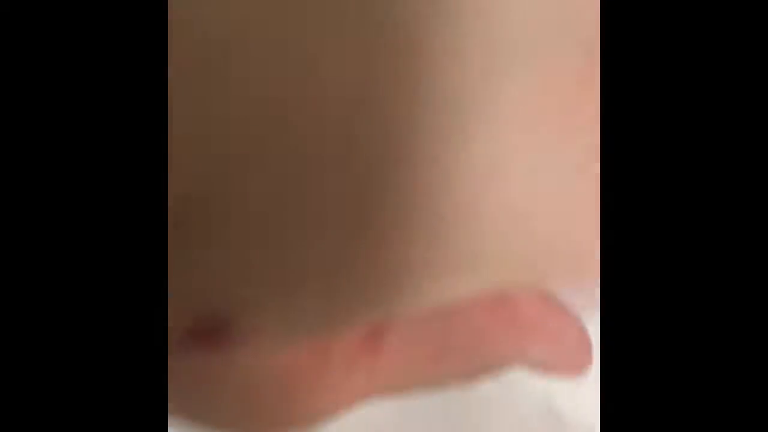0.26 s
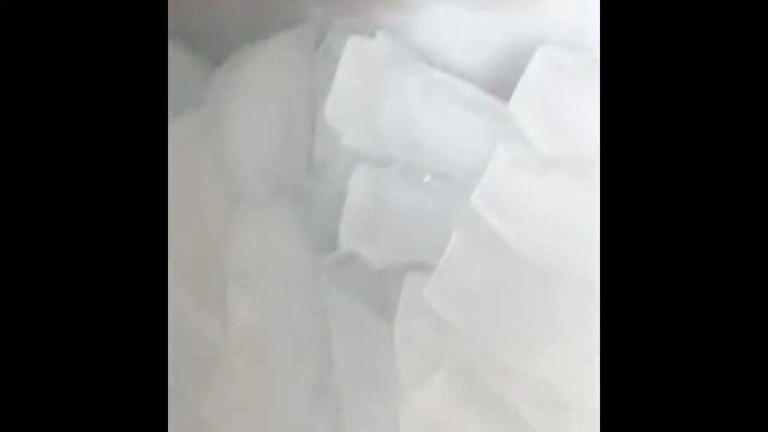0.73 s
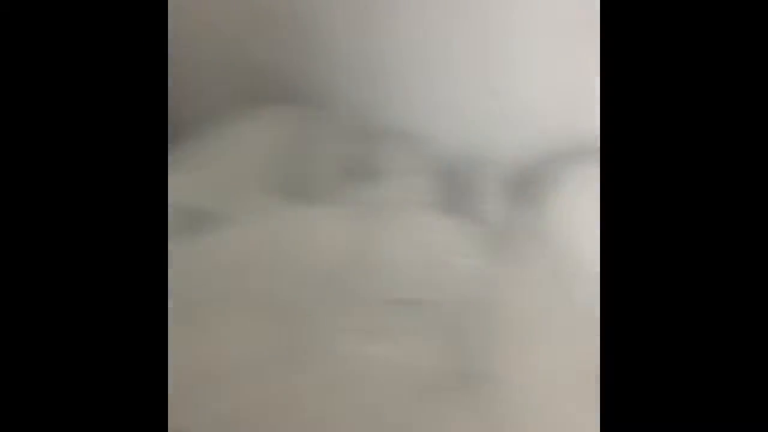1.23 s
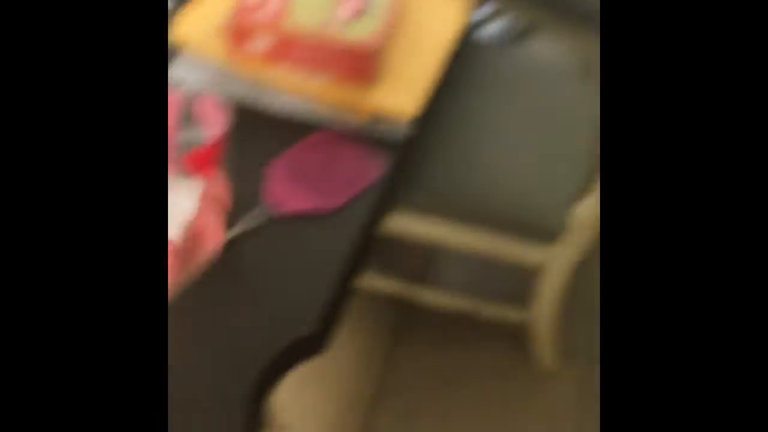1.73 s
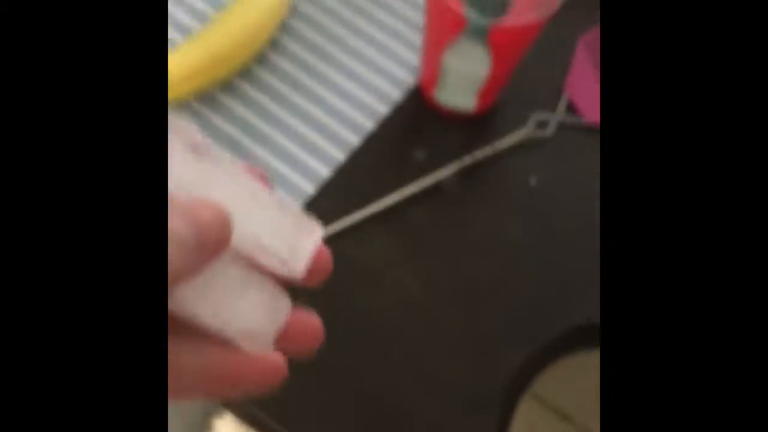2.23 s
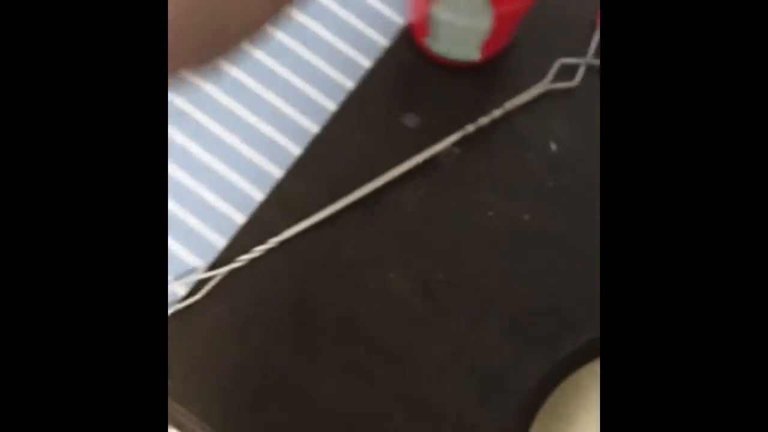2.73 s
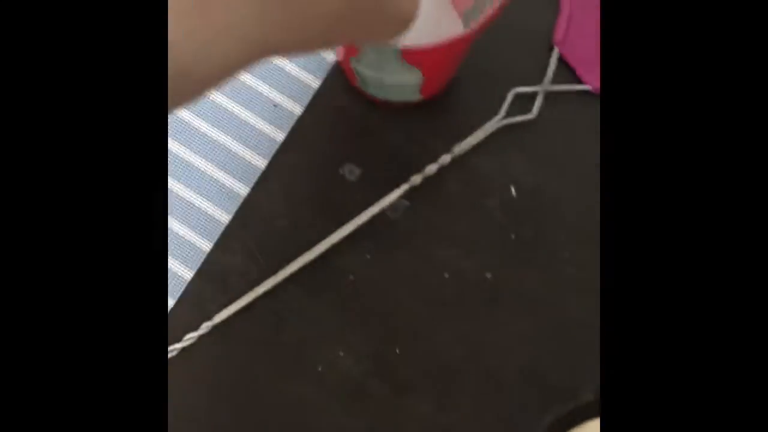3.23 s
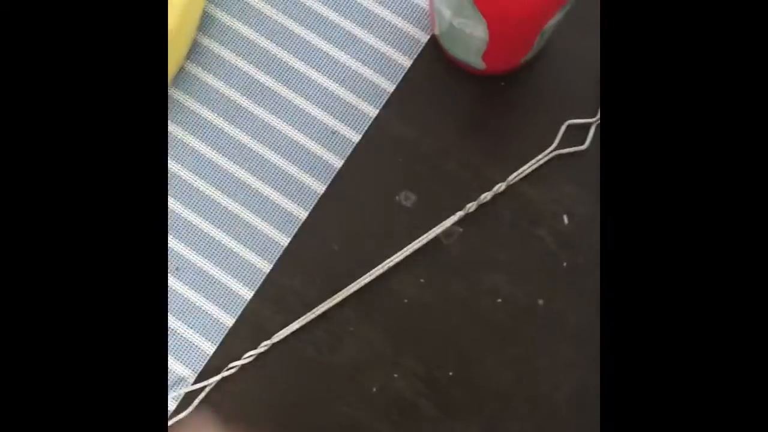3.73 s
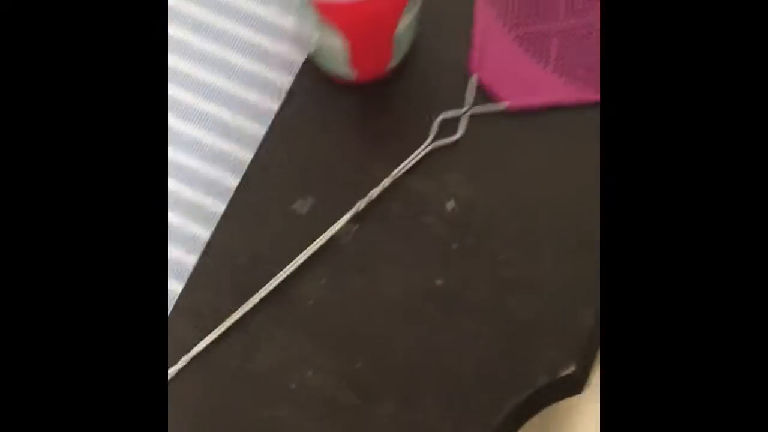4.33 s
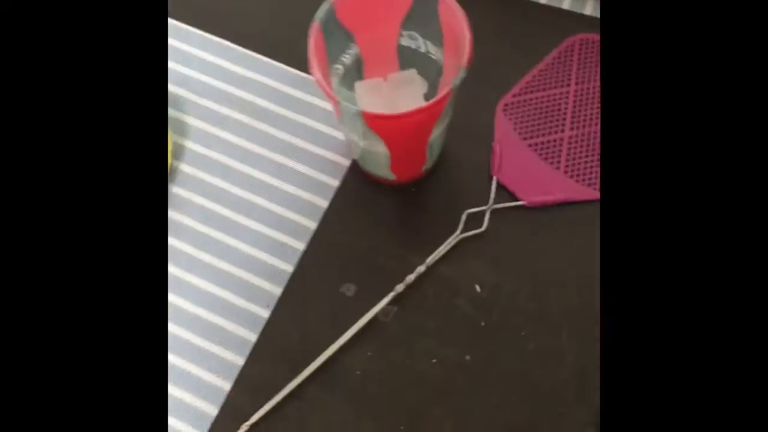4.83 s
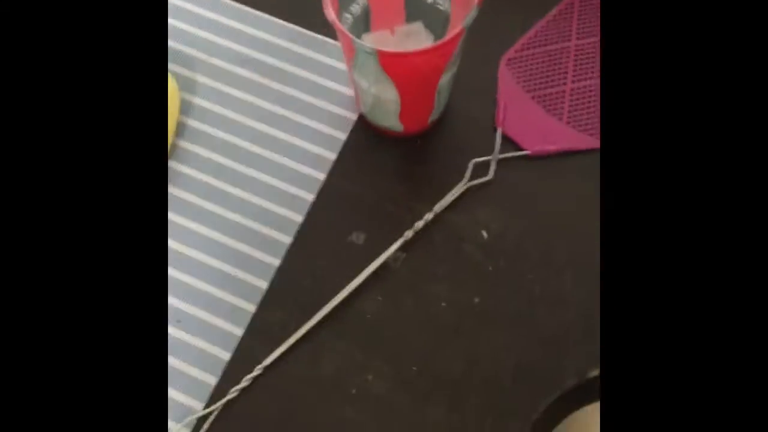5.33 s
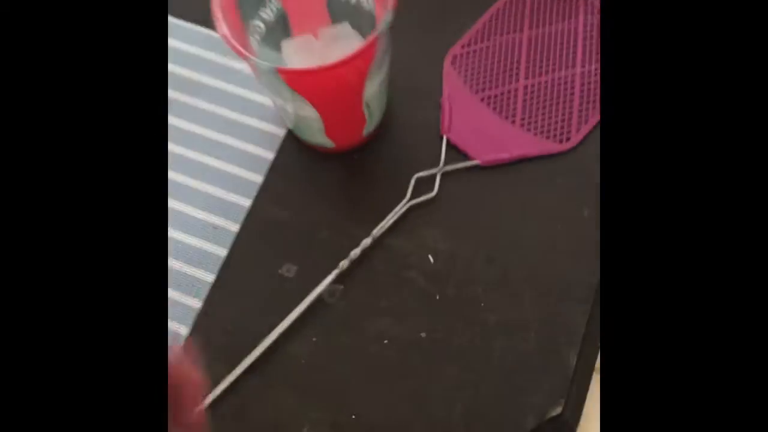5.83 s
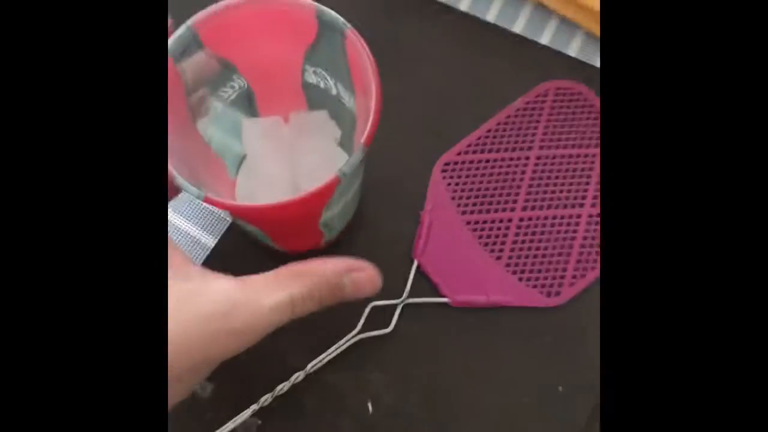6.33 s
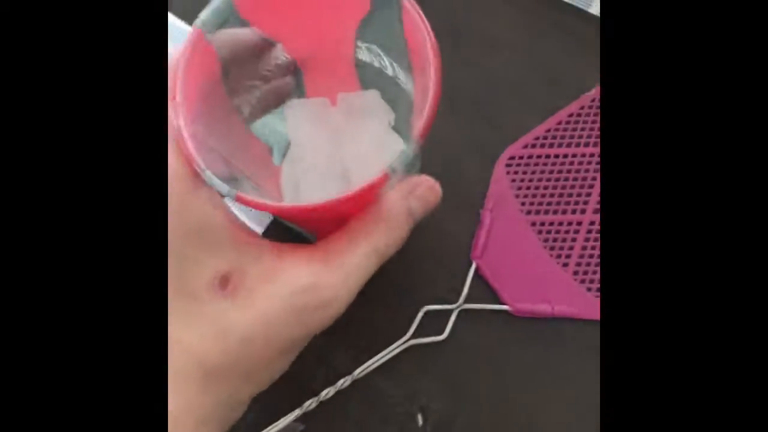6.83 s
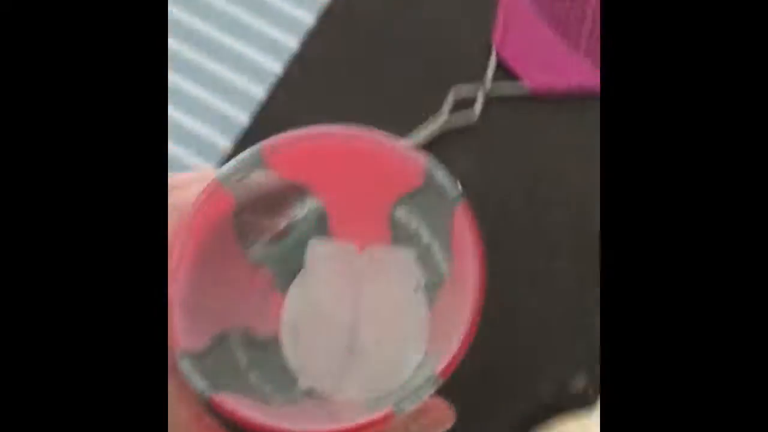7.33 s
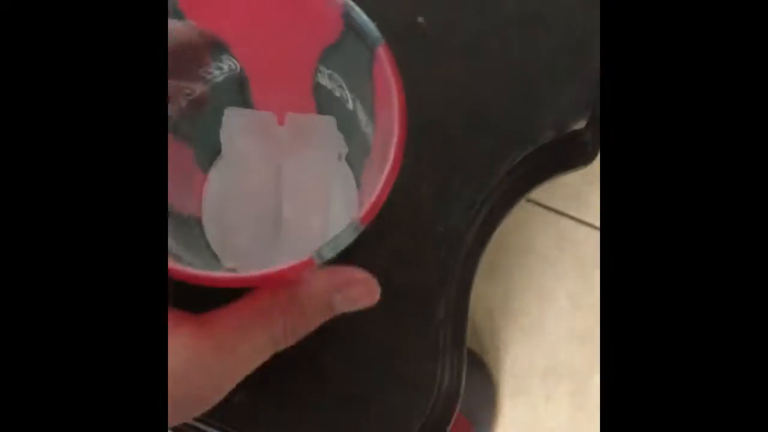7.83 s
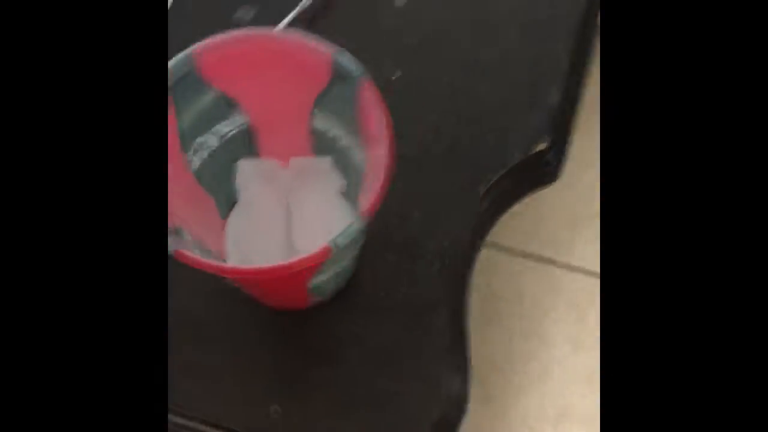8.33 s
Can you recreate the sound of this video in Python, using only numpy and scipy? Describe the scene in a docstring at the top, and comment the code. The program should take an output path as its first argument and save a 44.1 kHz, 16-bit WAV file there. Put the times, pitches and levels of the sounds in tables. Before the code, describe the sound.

Over a low freezer hum, a hand rummages through ice, cubes bounce in a plastic cup, a door thumps shut, and the cup lands hard and scrapes.

```python
"""Ice into a plastic cup

A hand digs ice cubes out of a freezer bin and drops them into a plastic cup on a kitchen table.
The freezer hums and rumbles, duller once its door slams; the cup is handled, set down hard and rocks to rest.
Slippers scuff on the tiles and faint high pings repeat at first, in a small hard room.
Blows are damped modes and filtered noise bursts; rubbing and air are shaped noise; the motor is a few sines."""
import sys
import numpy as np
from scipy import signal
from scipy.fft import rfft, irfft, next_fast_len
from scipy.io import wavfile
from scipy.ndimage import uniform_filter1d, minimum_filter1d, map_coordinates

SR = 44100
rng = np.random.default_rng(int(sys.argv[2]) if len(sys.argv) > 2 else 0)


def log_audio(samples):
    """Write samples as a 16-bit WAV file to the path given in sys.argv[1]."""
    # one column per channel
    frames = np.atleast_2d(samples).T
    # limit to full scale, then quantise
    limited = np.clip(frames, -1, 1)
    pcm = np.round(limited * 32767).astype(np.int16)
    wavfile.write(sys.argv[1], SR, pcm)


N = 377937
TIME = np.arange(N) / SR
AGE = TIME[:SR // 2]  # time since a blow (s)
DRAG_PEAK_S = 7.96  # the cup's base drags loudest here

# resonances of the air in the cup: [pitch_hz, level_db, t60_s]
CUP_HOLLOW = [(675, 0.5, 0.095), (632, -7, 0.059), (712, -10.5, 0.085)]


def amp(db):
    """Decibels to a linear factor."""
    return 10 ** (np.asarray(db) / 20)


def unit(x):
    """x scaled to an rms of 1."""
    return x / np.sqrt(np.mean(x ** 2) + 1e-20)


def peaked(x):
    """x scaled to a peak of 1."""
    return x / (np.abs(x).max() + 1e-20)


def along(points, hz):
    """Interpolate (Hz, value) points on a log frequency axis."""
    f, v = np.transpose(points)
    return np.interp(np.log(hz + 1), np.log(f + 1), v)


def curves(rows):
    """One value per sample for each column after the time."""
    s, *cols = np.transpose(rows)
    return [np.interp(TIME, s, c) for c in cols]


def wobble(rate):
    """A smooth random curve with rate knots a second."""
    knots = rng.standard_normal(int(N * rate / SR) + 4)
    return map_coordinates(knots, [TIME * rate])


def add(track, s, sound):
    """Mix a sound into a track at time s."""
    start = max(round(s * SR), 0)
    track[start:start + len(sound)] += sound[:N - start]


def coloured(x, spectrum):
    """Filter x to a (Hz, dB) spectrum with minimum phase, so nothing sounds before its cause."""
    m = 2 * next_fast_len(len(x) // 2 + 2048)
    gain = amp(along(spectrum, np.fft.rfftfreq(m, 1 / SR)))
    cepstrum = irfft(np.log(np.maximum(gain, 1e-5)))
    # folding the cepstrum onto positive time gives the minimum phase
    cepstrum[1:m // 2] *= 2
    cepstrum[m // 2 + 1:] = 0
    return irfft(rfft(x, m) * np.exp(rfft(cepstrum)), m)[:len(x)]


def band(x, lo_hz, hi_hz):
    """Causal band-pass."""
    edges = [lo_hz, min(hi_hz, SR / 2 - 1)]
    return signal.sosfilt(signal.butter(2, edges, "band", fs=SR, output="sos"), x)


def noise(spectrum):
    """Steady coloured noise of rms 1."""
    return unit(coloured(rng.standard_normal(N), spectrum))


def burst(t60):
    """White noise dying by 60 dB in t60 seconds."""
    return rng.standard_normal(len(AGE)) * amp(-60 * AGE / t60)


def ring(modes, scatter_db, lead=0):
    """Damped modes, at new strengths for each blow; lead (s) advances their phase."""
    total = 0
    for hz, db, t60 in modes:
        level_db = db + scatter_db * rng.standard_normal()
        total = total + amp(level_db - 60 * AGE / t60) * np.sin(2 * np.pi * hz * (AGE + lead))
    return total


def in_kitchen(x, wet_db):
    """A sound and the room's answer: a noise tail whose frequencies each die at their own speed."""
    # the kitchen's decay: [pitch_hz, t60_s]
    room_decay = [(100, 0.72), (700, 0.39), (3000, 0.42), (8000, 0.3), (15000, 0.087)]
    hz, t, z = signal.stft(rng.standard_normal(len(AGE)), SR, nperseg=256)
    fade = amp(-60 * t / along(room_decay, hz)[:, None])
    tail = signal.istft(z * fade, SR, nperseg=256)[1]
    tail = tail * (1 - np.exp(-TIME[:len(tail)] / 0.002))
    answer = signal.fftconvolve(x, tail / np.linalg.norm(tail))[:len(x)]
    return x + amp(wet_db) * answer


def contact(body, clack_db, splinter_db, clack_t60, splinter_t60, crush):
    """A hard contact: a clack in the body's colour and a brighter splinter, building up while the tips crush."""
    rise = 1 - np.exp(-AGE / crush)
    clack = band(coloured(rise * burst(clack_t60), body), 1000, 6500)
    splinter = band(coloured(rise * burst(splinter_t60), body), 5800, 17000)
    return amp(clack_db) * peaked(clack) + amp(splinter_db) * peaked(splinter)


def ice_bin():
    """Cubes grind and clack against each other; each rings at its own size and shakes the pile and the bin."""
    # the loudest cubes knocking, levels before the trims below: [start_s, clack_db, splinter_db]
    bin_hits = [(0.015, -11.5, -34.5), (0.0523, -25, -38.5), (0.0932, -19.5, -33), (0.19, -30.5, -30),
                (0.2174, -18.5, -34.5), (0.2247, -15, -25.5), (0.2428, -14.5, -26), (0.2652, -16, -25.5),
                (0.3128, -12, -34), (0.337, -13.5, -32.5), (0.3444, -12.5, -36), (0.3595, -19, -37.5),
                (0.3835, -20.5, -37), (0.4763, -32.5, -30.5), (0.504, -13.5, -28), (0.5312, -16.5, -32.5),
                (0.5427, -15.5, -30.5), (0.5617, -13, -30), (0.6276, -14, -32.5), (0.7069, -13.5, -34.5)]
    # colour of ice in its bin: [pitch_hz, level_db]
    bin_colour = [(88, -38), (150, -9.5), (205, 3), (455, -10.5), (727, -8), (883, -15), (1230, -9),
                  (1550, -14.5), (3260, -22.5), (7250, -30), (10500, -32), (11600, -30.5), (12800, -31),
                  (14300, -22), (15800, -22.5)]
    # ice cubes ringing: [pitch_hz, level_db, t60_s]
    cube_modes = [(6560, -4.5, 0.032), (7830, -4, 0.053), (9910, -4, 0.083), (11240, -0.5, 0.027),
                  (11830, 2, 0.029), (14050, 0, 0.05), (14700, -4, .07)]
    dig_end_s, clinks_per_s, clink_scatter_db = 0.55, 45, 2
    out = np.zeros(N)

    # small clinks while the hand digs, unevenly spaced
    clinks = []
    chance = rng.standard_normal((int(np.ceil(dig_end_s * clinks_per_s)), 3))
    for k, (when, a, b) in enumerate(chance):
        s = (k + 0.5 + when / 2) / clinks_per_s
        clinks.append((s, -24.5 + clink_scatter_db * a, -39.5 + clink_scatter_db * b))

    for s, clack_db, splinter_db in list(bin_hits) + clinks:
        size = np.exp(0.02 * rng.standard_normal())
        cube = ring([(hz / size, db, t60) for hz, db, t60 in cube_modes], scatter_db=5.5)
        # the pile never rests the same way twice
        pile_hz = 2200 * np.exp(0.42 * rng.standard_normal(5))
        pile = ring([(hz, 0, 0.04) for hz in pile_hz], scatter_db=0.5)
        knock = band(coloured(burst(0.073) * (1 - np.exp(-AGE / 0.0036)), bin_colour), 175, 1260)
        knock_db = -17.5 + 0.506 * clack_db  # the bin's knock grows more slowly than the clack
        add(out, s, contact(bin_colour, clack_db - 2.5, splinter_db + 5,
                            clack_t60=0.033, splinter_t60=0.016, crush=0.002))
        add(out, s, amp(splinter_db + 6.5) * peaked(cube))
        add(out, s, amp(clack_db - 3) * peaked(pile))
        add(out, s, amp(knock_db) * peaked(knock))

    # cubes grinding: sparse random grains in swelling clusters, settling after the dig
    grains = (rng.random(N) < 3500 / SR) * rng.standard_normal(N) * amp(1.4 * wobble(40))
    grind_db = -38.5 - 54 * np.maximum(TIME - dig_end_s, 0)  # fades 54 dB per s
    out += amp(grind_db) * unit(band(coloured(grains, bin_colour), 170, 8000))
    return in_kitchen(out, wet_db=-16.5)


def ice_in_cup():
    """Cubes bounce in the cup, ring its wall and its hollow and jog the table."""
    # cubes striking the cup, levels before the trims below: [start_s, clack_db, splinter_db, ring_db]
    drops = [(3.3447, -32, -57.5, -21), (3.5495, -3, -18.5, -12), (3.5565, -7.5, -20.5, -14.5),
             (3.5685, -9.5, -17, -23), (3.5795, -10.5, -21, -14.5), (3.5865, -10.5, -16.5, -21.5),
             (3.5935, -20, -17, -23), (3.6235, -16, -26.5, -22), (3.663, -18.5, -10, -30),
             (3.6884, -19, -28.5, -10), (3.7092, -3.5, -24, -6), (3.7135, -2, -25.5, -14),
             (3.722, -15, -29.5, -15), (3.7365, -19.5, -25.5, -13.5), (3.7795, -17, -37, -17.5)]
    # resonances of the plastic wall: [pitch_hz, level_db, t60_s]
    wall_modes = [(555, -11, 0.082), (785, -7, 0.056), (1012, -12, 0.035), (1931, -17, 0.035),
                  (2273, -20.5, .04), (2904, -20.5, .03), (3970, -19, 0.028)]
    # colour of a click on the wall: [pitch_hz, level_db]
    wall_colour = [(530, -36.5), (900, -7), (1040, 2), (1160, -9), (1420, -3), (2030, 0), (2580, -7.5),
                   (3890, -7), (5000, -15.5), (5440, -8.5), (7700, -13), (12100, -9), (15800, -12.5)]
    out = np.zeros(N)
    for s, clack_db, splinter_db, ring_db in drops + settling(drops[-1], count=6):
        click = contact(wall_colour, clack_db - 4, splinter_db + 11.5,
                        clack_t60=0.014, splinter_t60=0.0028, crush=0.0012)
        wall = amp(clack_db - 5) * ring(wall_modes, scatter_db=2)
        # phase follows the clock, so each blow tops up the air's swing
        hollow = amp(ring_db - 4) * ring(CUP_HOLLOW, scatter_db=1, lead=s)
        hollow *= 1 - np.exp(-AGE / 0.00067)
        thud = band(burst(0.11) * (1 - np.exp(-AGE / 0.0069)), 65, 380)
        table = amp(ring_db - 17) * peaked(thud)
        add(out, s, in_kitchen(click + wall + table, wet_db=-11))
        add(out, s, in_kitchen(hollow, wet_db=-12))
    return out


def settling(blow, count):
    """After its last blow a cube chatters to rest in weaker contacts, at shrinking gaps after a short first one."""
    first_gap_s, gap_s, shrink = 0.011, 0.034, 0.9
    loss_db, ring_loss_db = 4.5, 16  # lost at each contact; extra loss of the ring
    s, clack_db, splinter_db, ring_db = blow
    delays = np.cumsum([first_gap_s] + [gap_s * shrink ** k for k in range(count)])
    contacts = []
    for k, delay in enumerate(delays):
        lost_db = loss_db * k
        contacts.append((s + delay, clack_db - lost_db, splinter_db - lost_db,
                         ring_db - ring_loss_db - lost_db))
    return contacts


def cup_on_table():
    """The cup's rim cracks on the table and its base flexes for a few cycles; near the end it drags."""
    # gripped, set down and rocking, levels before the trims below: [start_s, clack_db, base_db]
    knocks = [(6.7617, -44, -35), (6.7781, -29, -29.5), (7.1655, -52, -52.5), (7.3185, -48.5, -53),
              (7.6798, -9, -3.5), (7.9036, -47, -33.5), (7.9295, -43.5, -31), (7.9851, -24, -15)]
    # colour of the cup's base: [pitch_hz, level_db]
    base_colour = [(530, -33), (900, -0.5), (1370, -2), (1560, -5), (2080, -6.5), (2810, -16), (3620, -11),
                   (5000, -20.5), (6660, -13.5), (8570, -23.5), (9900, -14), (11800, -22), (15800, -19)]
    # the rim under the cup: [pitch_hz, level_db, t60_s]
    rim_modes = [(1960, -10, 0.012), (2129, -5.5, 0.011), (3090, 3, 0.014), (3355, 1, 0.02),
                 (3803, -2.5, 0.018)]
    clicks, body = np.zeros((2, N))
    for s, clack_db, base_db in rebounds(knocks, count=3) + slips(count=12):
        add(clicks, s, contact(base_colour, clack_db - 0.5, clack_db - 9,
                               clack_t60=0.012, splinter_t60=0.006, crush=0.001))
        rim_db = 2.21 * clack_db + 6.5  # only hard blows wake the rim
        rim = amp(rim_db) * peaked(ring(rim_modes, scatter_db=4.5) * (1 - np.exp(-AGE / 0.00079)))
        flex = peaked(AGE ** 5 * np.exp(-AGE / 0.00075)) * np.sin(2 * np.pi * 672 * AGE)
        hollow = amp(-28) * ring(CUP_HOLLOW, scatter_db=1.5)
        table = amp(-18) * peaked(band(burst(0.033), 160, 590))
        add(body, s, rim + amp(base_db + 4.5) * (flex + hollow + table))
    touching = np.interp(TIME, [7.76, 7.83, 8.05, 8.16], [0, 1, 1, 0])
    drag = touching * amp(drag_level(TIME) + 4.5 * wobble(120)) * noise(base_colour)
    return in_kitchen(clicks, wet_db=-13) + in_kitchen(body, wet_db=-21.5) + drag


def rebounds(knocks, count):
    """Each knock of the cup and its ever quicker, weaker rebounds."""
    flight_s, shrink = 0.0247, 0.61  # first rebound; each flight over the one before
    clack_loss_db, base_loss_db = 9.5, 4.5  # lost at each rebound
    edge_db = -14  # landing on its edge, the base flexes less
    delays = np.cumsum([0] + [flight_s * shrink ** k for k in range(count)])
    blows = []
    for s, clack_db, base_db in knocks:
        for k, delay in enumerate(delays):
            flex_db = base_db - base_loss_db * k + edge_db * (k > 0)
            blows.append((s + delay, clack_db - clack_loss_db * k, flex_db))
    return blows


def drag_level(s):
    """The dragging of the cup swells and fades at steady dB per second: dB at time s."""
    rise_db_per_s, fall_db_per_s = 60.5, 75
    below_peak = np.maximum(rise_db_per_s * (DRAG_PEAK_S - s), fall_db_per_s * (s - DRAG_PEAK_S))
    return -54.5 - below_peak


def slips(count):
    """The dragging base catches and slips: small uneven ticks around the height of the drag."""
    slips_per_s = 40
    times = DRAG_PEAK_S + (np.arange(count) - count / 2 + rng.random(count)) / slips_per_s
    # [start_s, clack_db, base_db], like the knocks
    return [(s, drag_level(s) + 11, drag_level(s) + 12.5) for s in times]


def freezer_door():
    """The door squashes its seal with a soft bump, then slams: the panel booms and the shelves rattle."""
    # frame and latch striking: [start_s, crack_db, rattle_db]
    door_hits = [(6.509, -26.5, -11), (6.5136, 3, -13)]
    # resonances of the panel: [pitch_hz, level_db, t60_s]
    panel_modes = [(80, 3.5, 0.21), (151, -10, 0.36), (339, -17.5, 0.2), (525, -26, 0.53),
                   (631, -29.5, 0.78), (873, -31, 0.54), (1060, -29.5, 0.4), (1058, -13.5, 0.16),
                   (1364, -11, 0.06), (1565, -26.5, 0.22)]
    # colour of the rattle: [pitch_hz, level_db]
    rattle_colour = [(71, -52), (120, -1.5), (156, -2), (272, -14), (361, -9.5), (443, -17), (491, -16.5),
                     (802, -11), (1050, -10.5), (2570, -34.5), (3780, -23), (6180, -26), (15800, -29.5)]
    # colour of the rubber seal: [pitch_hz, level_db]
    seal_colour = [(590, -37), (1000, -5), (1930, -8.5), (3730, -2), (4090, -5.5), (6420, -5), (10200, -16),
                   (15800, -14.5)]
    seal_s, hold_s, release_db_per_s = 6.380, 0.032, 562.5
    squash_db = -42 - release_db_per_s * np.maximum(TIME - seal_s - hold_s, 0)
    squash = (TIME > seal_s) * amp(squash_db)
    pop = amp(-26.5) * np.exp(-((TIME - 6.404) / 0.0045) ** 2)  # air squeezed out of the seal
    out = (squash + pop) * noise(seal_colour)
    bump = band(burst(0.19) * (1 - np.exp(-AGE / 0.0037)), 60, 450)
    add(out, 6.396, amp(-27.5) * peaked(bump))
    out = in_kitchen(out, wet_db=-6.5)
    for s, crack_db, rattle_db in door_hits:
        crack = amp(crack_db) * peaked(band(burst(0.0039), 900, 15000))
        rattle = amp(rattle_db) * peaked(coloured(burst(0.26), rattle_colour))
        add(out, s, in_kitchen(crack, wet_db=-3.5) + in_kitchen(rattle, wet_db=-10))
    boom = ring(panel_modes, scatter_db=0.5) * (1 - np.exp(-AGE / 0.0006))
    add(out, 6.5135, amp(-11) * boom)
    return out


def taps():
    """Small taps and bumps of handling around the table: noise bursts, each in its own band."""
    # [start_s, level_db, pitch_hz, t60_s]
    tap_events = [(0.987, -33, 52, 0.22), (3.338, -34.5, 6450, 0.018), (3.342, -39.5, 1500, .12),
                  (4.574, -29.5, 99, 0.099), (4.602, -35.5, 3330, 0.022), (4.817, -46, 1474, 0.027),
                  (4.850, -45.5, 1000, .12), (4.912, -46.5, 9000, .04), (6.742, -36, 4070, 0.021),
                  (7.1655, -37, 6400, 0.012), (8.004, -31.5, 1880, 0.059), (8.028, -36, 4550, 0.0071),
                  (8.106, -50, 4000, 0.012), (8.2855, -54, 6000, 0.013)]
    out = np.zeros(N)
    for s, db, hz, t60 in tap_events:
        tap = band(burst(t60) * (1 - np.exp(-AGE / 0.00085)), hz * 0.55, hz * 1.4)
        add(out, s, amp(db) * peaked(tap))
    return in_kitchen(out, wet_db=-7.5)


def slippers():
    """A sole lands, slides briefly over the tile and lifts: broad rubbing noise plus a band of grit."""
    # [start_s, length_s, level_db, grit_hz]
    scuffs = [(0.757, 0.1, -54, 2440), (.89, 0.031, -48.5, 2870), (1.139, 0.076, -58, 1980),
              (1.529, 0.065, -57.5, 7300), (1.953, 0.14, -53, 980), (2.584, .09, -37.5, 2940),
              (5.79, 0.1, -61.5, 2000), (5.939, 0.084, -50.5, 1110)]
    # colour of the rubbing sole: [pitch_hz, level_db]
    sole_colour = [(300, -24), (1000, -0.5), (3000, 0), (6300, 0), (8000, -6.5), (11500, -4), (15800, -9.5)]
    out = np.zeros(N)
    for s, length, db, grit_hz in scuffs:
        rub = unit(coloured(rng.standard_normal(len(AGE)), sole_colour))
        grit = unit(band(rng.standard_normal(len(AGE)), grit_hz * 0.76, grit_hz * 1.3))
        lift = amp(-60 * np.maximum(AGE - length, 0) / 0.12)
        stroke = (1 - np.exp(-AGE / 0.004)) * lift
        add(out, s, amp(db) * stroke * unit(rub + amp(1) * grit))
    return in_kitchen(out, wet_db=-10)


def pings():
    """Thin, high pings: a few damped modes with a narrow band of dying noise."""
    # levels before the trims below: [start_s, level_db]
    ping_events = [(0.837, -44), (1.013, -41), (1.26, -47), (1.4836, -45.5), (1.7183, -46.5),
                   (1.9997, -43.5), (2.171, -50), (2.9345, -56), (3.1517, -50), (3.3844, -50)]
    # [pitch_hz, level_db, t60_s]
    ping_modes = [(6110, -4.5, .5), (10160, 6, 0.22), (13900, -3.5, 0.28)]
    out = np.zeros(N)
    for s, db in ping_events:
        hiss = peaked(band(burst(0.32), 8800, 10600))
        add(out, s, amp(db - 12.5) * ring(ping_modes, scatter_db=3) + amp(db - 2) * hiss)
    return in_kitchen(out, wet_db=-8)


def freezer():
    """The motor hums and the fan rumbles, louder close by; the shut door muffles both."""
    # closeness to the open freezer: [time_s, gain_db over the level at the table]
    nearness = [(0, 5), (0.7, 8), (1.4, 4.5), (2.2, 1.5), (4.0, 0)]
    # partials of the motor: [pitch_hz, level_db]
    hum_partials = [(102.3, -8), (198, -15.5), (204.6, 5.5), (306.9, -24.5), (608.3, -21.5)]
    # colour of the fan with the door open: [pitch_hz, level_db]
    open_colour = [(15, -42), (25, -15.5), (75, 0.5), (151, -5), (202, -0.5), (224, -10.5), (253, -10.5),
                   (290, -18), (394, -17.5), (493, -24), (605, -27.5), (913, -44.5), (1500, -52.5),
                   (1950, -64), (3300, -120)]
    # colour of the fan with the door shut: [pitch_hz, level_db]
    shut_colour = [(15, -49.5), (25, -14.5), (70, 2.5), (92, -5), (316, -20.5), (460, -27), (659, -34),
                   (796, -44.5), (1010, -40.5), (1500, -56), (1950, -63.5), (3300, -120)]
    # colour of the air hiss: [pitch_hz, level_db]
    air_colour = [(410, -26), (700, -0.5), (1120, -5), (1680, -7.5), (4890, -15), (6020, -14), (7710, -18),
                  (15800, -14)]
    near_db, = curves(nearness)
    door_open = np.interp(TIME, [6.1, 6.55], [1, 0])
    door_shut = 1 - door_open
    turns = TIME + 0.00018 * wobble(3)  # the motor's speed wavers
    hum = unit(sum(amp(db) * np.sin(2 * np.pi * hz * turns) for hz, db in hum_partials))
    hum *= amp(-46.5 + 0.9 * wobble(12)) * (door_open + door_shut * amp(-22.5))
    fan = door_open * amp(-46) * noise(open_colour) + door_shut * amp(-50) * noise(shut_colour)
    air = amp(-65 + 1.1 * near_db) * noise(air_colour)  # rises a little faster than the rest
    return amp(near_db) * (hum + fan) + air


def scene():
    """All layers summed to one channel."""
    ice = ice_bin() + ice_in_cup()
    handling = cup_on_table() + taps()
    around = freezer_door() + slippers() + pings() + freezer()
    return (ice + handling + around)[None]


def record(dry):
    """Thin the deepest bass, limit the peaks and keep nothing above the band limit."""
    top_hz = 15900
    thinned = signal.sosfilt(signal.butter(3, 38, "high", fs=SR, output="sos"), dry)
    needed = 1 / np.maximum(np.abs(thinned), 1)
    gain = uniform_filter1d(minimum_filter1d(needed, size=65), size=65)  # sizes in samples
    m = next_fast_len(N + SR // 2)
    keep = np.fft.rfftfreq(m, 1 / SR) < top_hz
    return irfft(rfft(thinned * gain, m) * keep, m)[..., :N]


dry = scene()
out = record(dry)
log_audio(out)
```